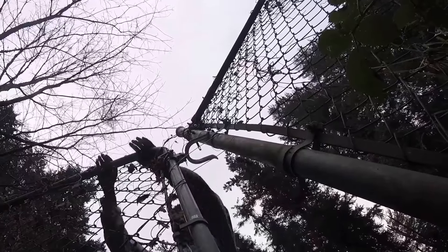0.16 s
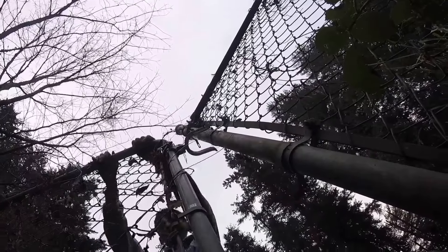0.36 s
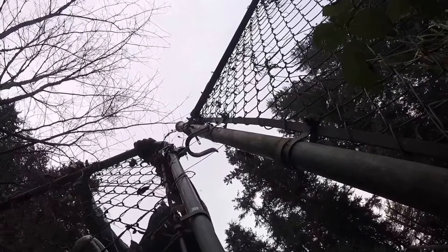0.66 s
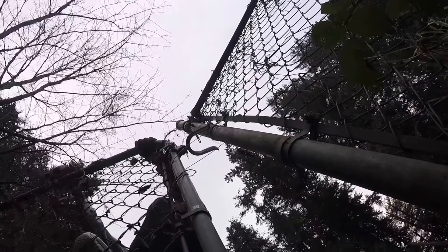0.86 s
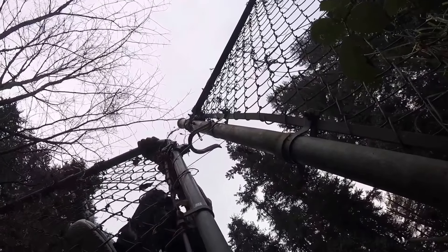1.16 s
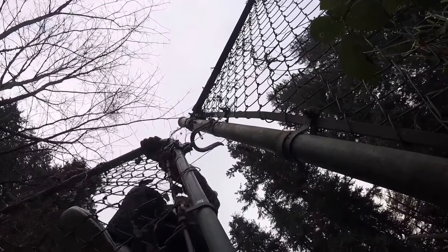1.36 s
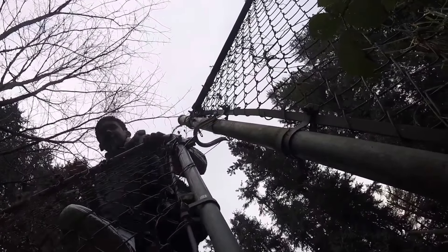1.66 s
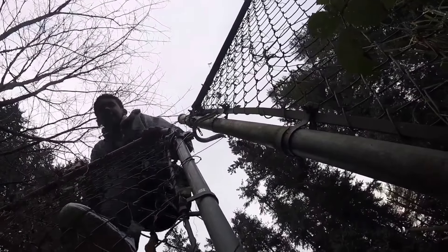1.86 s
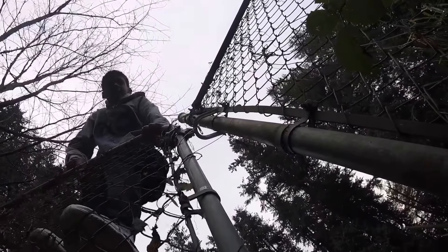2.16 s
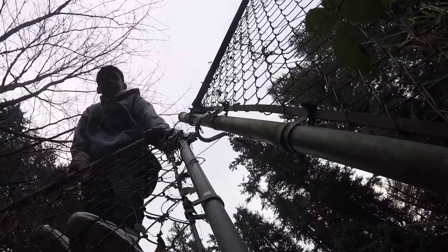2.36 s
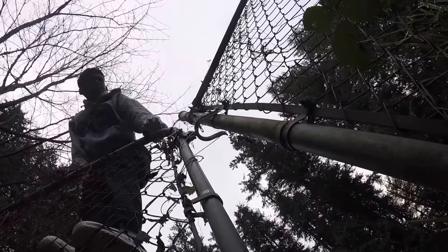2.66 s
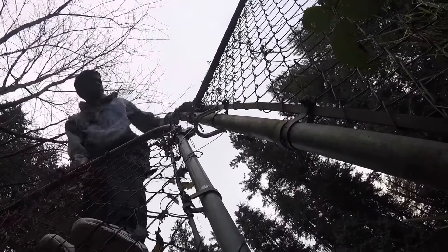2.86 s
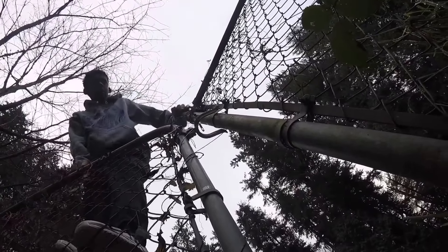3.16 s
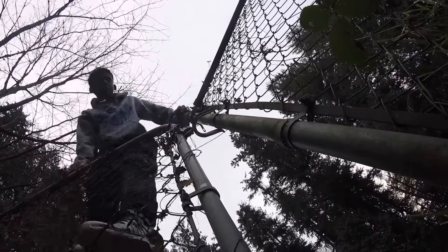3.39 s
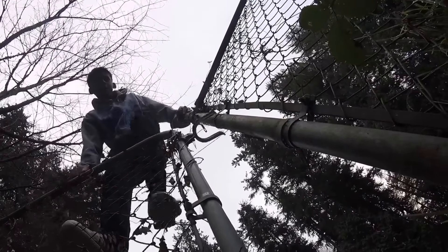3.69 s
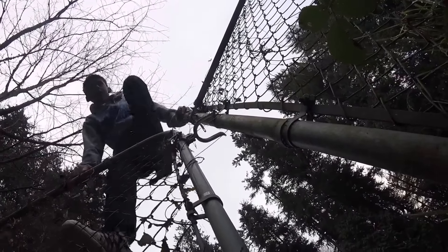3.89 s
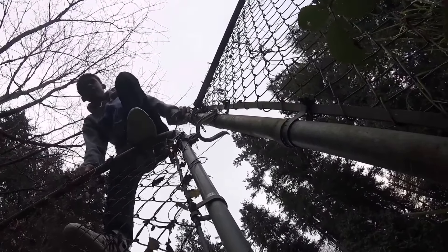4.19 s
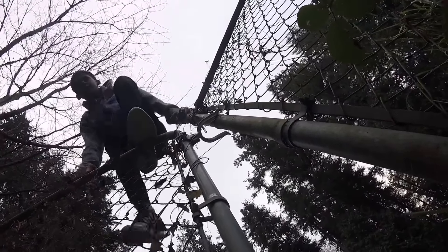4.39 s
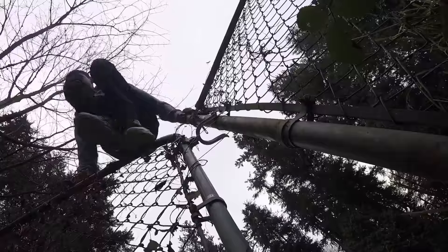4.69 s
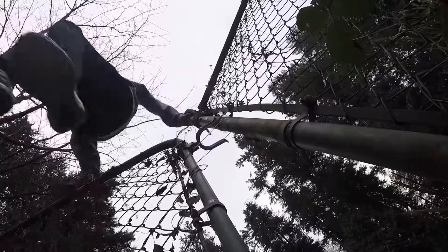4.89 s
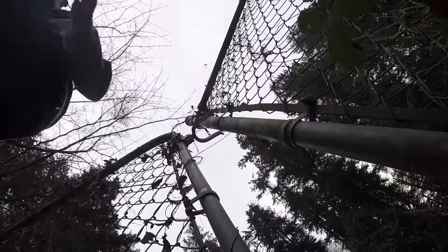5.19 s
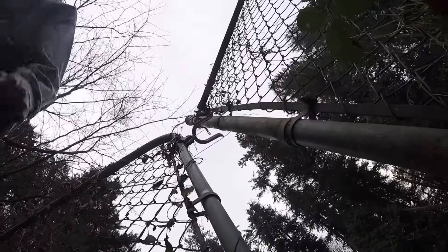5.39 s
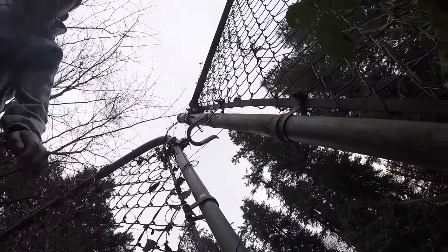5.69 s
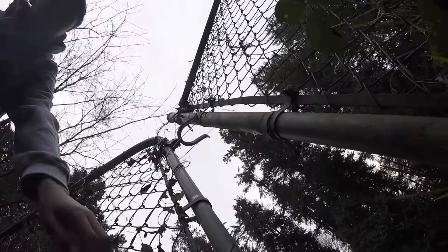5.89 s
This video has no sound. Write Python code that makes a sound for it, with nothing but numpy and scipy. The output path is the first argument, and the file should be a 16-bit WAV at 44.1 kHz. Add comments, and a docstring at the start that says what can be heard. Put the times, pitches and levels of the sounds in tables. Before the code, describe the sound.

Outdoors, close to the foot of a steel gate post, with very faint far traffic, treetop wind and a barely audible low hum in the first half second. Soft thumps and small wire ticks begin around 0.2 s. At 0.6-0.8 s hard clanks and a deep jolt shake the gate, leaving a short hollow pipe ring and rumble. Mesh rattles and jingles strongly from 1.2 to 1.6 s; more clanks, knocks and a heavy thump fall around 1.9-2.5 s, thinning until 3.2 s. The loudest, brightest clatter strikes at 3.3-3.85 s with a ringing hook and heavy thuds. Another thump near 4.1 s accompanies a tiny sole chirp and squeak. Lighter clinks and a swelling low rumble follow at 4.7-5 s. At 5.1 s a solid landing crushes dry leaves, with crisp snaps until 5.4 s, then small rustles and scuffs, one with a soft thud at 5.84 s.

```python
"""A chain-link gate rattles and clanks on its steel pipes as a person climbs it and drops into dry leaves.
Mesh is modulated noise and damped taps; struck steel is noise bursts and decaying modes.
Shifts of weight thump as damped swings and rumble as filtered noise; a sole squeaks in stick-slip harmonics.
Leaves are clumped noise, grains and snaps; far traffic and treetop wind are shaped noise beside a brief hum.
All is heard from the foot of the post."""
import sys
import numpy as np
from scipy.fft import rfft, irfft, next_fast_len
from scipy.io import wavfile
from scipy.ndimage import uniform_filter1d, map_coordinates

SR = 44100
rng = np.random.default_rng(int(sys.argv[2]) if len(sys.argv) > 2 else 0)


def generate_wav(signal):
    """Clip the signal to [-1, 1] and save it as 16-bit WAV at the path in sys.argv[1]."""
    frames = np.transpose(np.atleast_2d(signal))
    scaled = np.clip(frames, -1, 1) * 32767
    pcm = np.round(scaled).astype(np.int16)
    wavfile.write(sys.argv[1], SR, pcm)


N = 266364

# Levels are relative: each source applies its own gain. Spectra list f/Hz, relative level/dB.

# mesh wires rubbing and tapping: t/s, level/dB, treble share/dB
MESH_MOTION = [(0.0, -58, -18), (0.35, -47.5, 2.5), (0.56, -47.5, 1), (0.6, -37.5, 4), (0.8, -47.5, 12),
               (0.95, -52, 9), (1.18, -37, -8), (1.28, -48, -14), (1.35, -34, 3.5), (1.48, -28.5, 3.5),
               (1.59, -31.5, -19), (1.69, -55, -4), (1.8, -36.5, -6), (1.98, -39.5, -7), (2.33, -40.5, 1),
               (2.68, -50.5, 3.5), (3.29, -53, -6), (3.45, -41.5, 4), (3.5, -31, 12), (3.6, -39, -8),
               (3.74, -36, 9), (3.86, -55, -3), (4.1, -50, -15), (4.16, -40, 15), (4.4, -55.5, -4),
               (4.7, -41, -2), (4.91, -51.5, -7), (5.03, -38, -8), (5.07, -42, -15)]
# single wire ticks: t/s, level/dB
WIRE_TICKS = [(0.265, -37), (0.3267, -38), (0.342, -41), (0.385, -37), (0.428, -36.5), (0.4655, -35),
              (0.513, -37), (0.53, -40), (0.6543, -25), (0.7293, -29), (0.774, -33), (0.795, -36.5),
              (0.878, -26), (0.9535, -30.5), (1.0844, -35.5), (1.183, -34.5), (2.0094, -34),
              (2.3444, -33.5), (2.801, -30), (3.1, -41), (3.334, -31), (3.5494, -19), (3.78, -29),
              (4.349, -36), (4.622, -35), (4.667, -38)]
# bright shiver and thin hiss of the wires: f/Hz, level/dB
WIRE_SPECTRUM = [(2500, -25), (4300, -2), (6300, 6), (8500, -11), (11000, -8), (12000, -29), (15500, -40)]
# steel on steel: t/s, level/dB, dull share/dB, bright share/dB, fade/(dB per ms)
STEEL_CLANKS = [(0.582, -11, -23, -2.5, 0.6), (0.6126, -6, -24, -12, 1), (0.641, -30.5, 16.5, -14, 1),
                (0.676, -24.5, -22, 0.5, 0.1), (0.707, -25, -30.5, 8.5, 1.5), (0.8178, -4, -20, -7.5, 1.04),
                (0.986, -30, 4, -11, 1.5), (1.118, -31.5, -22.5, -1, -0.1), (1.337, -13, 14, -17, 4),
                (1.342, -34, 5, -3, 0.2), (1.4097, -29, -12, 8.5, 3.5), (1.4906, -18, 7, -9, 0.7),
                (1.5305, -9, -2.5, -3, 1.3), (1.5856, -16, 4.5, -2, 1.5), (1.6027, -10.5, 4.5, -17, 2.7),
                (1.77, -34.5, 4, -10, 0.6), (1.7874, -21.5, 1.5, -9.5, 0.5), (1.8853, -12.5, -7, -13, 1.5),
                (1.8966, -3.5, -8, -11.5, 1), (1.9546, -32.5, 27, -19, 2), (2.0855, -27, 6, 8.5, 2.5),
                (2.13, -26, 5, 4, 1.2), (2.197, -28, 14.5, -9, 0.9), (2.2678, -13, -1.5, -7, 1.1),
                (2.31, -20, 4, -12, 1.2), (2.3734, -15.5, 0.5, -12, 0.7), (2.3904, -9, 3, -5, 3.5),
                (2.4765, -25.5, 8, -0.5, 0.35), (2.5966, -25.5, 8.5, -8, 0.7),
                (2.7917, -31.5, 17.5, -10, 1.5), (2.8372, -24.5, -2, -0.5, 2.5),
                (2.8652, -20.5, -3, -1.5, 2), (2.997, -30, -3, -28.5, 0.3), (3.3057, -6.5, -30, -14, 1.8),
                (3.365, -29.5, 12.5, -11, 0.24), (3.409, -31, 12, -12, 1.8), (3.419, -30.5, 25, -24, 2.5),
                (3.462, -32, 2, -11, 0), (3.5034, -5.5, -27, -7, 2.5), (3.51, 0, -41, -6.5, 1.65),
                (3.6005, -7, -37, -9, 1.5), (3.6438, -13, 0.5, -9, 0.4), (3.674, -21, -9, -16, 1.5),
                (3.733, -3.5, -36, -14.5, 1), (3.801, -24, -5, -15, 1), (3.8432, -34, 19, -28, 2.5),
                (3.893, -33, -1, -31, 1.5), (3.927, -27, -1, -31, 3), (4.0427, -16.5, -6, -4.5, 1.2),
                (4.074, -24, -5, -13, 0.6), (4.1334, -22, -14.5, -12.5, 1.32), (4.2303, -14, -19, -14, 1),
                (4.3, -23.5, 0.5, -31, 2.5), (4.7056, -21.5, -3, -0.5, 1), (4.7436, -19, 5, 3.5, 4.5),
                (4.8066, -14.5, -23, -43, 1.3), (5.016, -21.5, -2, -11, 0.9)]
# rise time constants/s of the dull, middle and bright part of a burst
BURST_RISES = (0.00057, 0.00085, 0.00076)
# heavy, middle and bright contacts: f/Hz, level/dB
DULL_SPECTRUM = [(250, 9.5), (500, -3.5), (900, 3), (1500, -3.5), (2200, -14.5), (3500, -70)]
MIDDLE_SPECTRUM = [(900, -8), (1600, 4), (2500, 4.5), (3600, -1), (4800, -7.5), (7000, -39)]
BRIGHT_SPECTRUM = [(2500, -36), (4300, -1), (6300, -1), (7500, -5), (9000, -14.5), (12000, -23),
                   (15500, -42)]
# thin top of a short, hard contact: f/Hz, level/dB
SPARK_SPECTRUM = [(6000, -30), (8500, 3), (11000, 0), (14000, -10), (15800, -15)]
# short broad modes of the struck pipes: f/Hz, level/dB, t60/s
CLACK_MODES = [(1115, -8, 0.079), (1440, -1.5, 0.041), (2530, 4, 0.046), (2747, -2, 0.022),
               (3517, 4, 0.024), (4640, -14, 0.022), (6300, -24, 0.023), (10100, -19, 0.027)]
# loose parts left ringing: t/s, part name, level/dB
PART_RINGS = [(.25, "post", -33), (.33, "post", -32.5), (.613, "bracket", -41), (.64, "post", -17.5),
              (0.731, "tie", -43), (.66, "bracket", -41), (.75, "post", -25), (.819, "bracket", -39),
              (.821, "hook", -31), (.84, "post", -30), (.985, "post", -24), (1.065, "brace", -50),
              (1.09, "post", -24), (1.185, "post", -30.5), (1.337, "brace", -44), (1.38, "brace", -46),
              (1.5, "post", -22.5), (1.531, "chain", -30), (1.54, "hook", -43), (1.788, "brace", -47),
              (1.9, "post", -28.5), (1.903, "hook", -38), (2.22, "post", -25), (2.267, "chain", -34.5),
              (2.269, "brace", -45), (2.27, "hook", -40.5), (2.31, "hook", -42.5), (2.395, "bracket", -37),
              (2.4, "hook", -44), (2.81, "post", -34), (3.305, "bracket", -43), (3.33, "post", -32.5),
              (3.366, "brace", -47), (3.51, "bracket", -34), (3.515, "hook", -20), (3.602, "chain", -44),
              (3.647, "chain", -34), (3.604, "hook", -37), (3.68, "post", -26.5), (3.735, "bracket", -38),
              (3.737, "hook", -35), (3.76, "post", -27), (3.94, "post", -37), (4.1, "post", -30),
              (4.72, "post", -26.5), (4.76, "post", -33), (4.82, "post", -32), (4.94, "post", -22.5),
              (5.02, "post", -27)]
# modes of each named part: f/Hz, level/dB, t60/s
PART_MODES = {"hook": [(6110, -6.5, 0.19), (6220, -1, 0.13), (6290, 9.5, 0.061), (6500, 4, 0.04)],
              "chain": [(4300, -19, 0.094), (5320, -3, 0.21), (5600, -2.5, 0.25), (7200, -15, 0.11)],
              "bracket": [(2167, 1, 0.39), (2520, -15, .1)], "brace": [(1747, 13, 0.2), (2890, -21, 0.084)],
              "tie": [(3990, 1.5, 0.177)], "post": [(275.4, 3.5, 0.31), (370.6, -6.5, 0.14)]}
# weight landing: t/s, level/dB, half-swing width/ms, following rumble/dB, frame ring/dB
WEIGHT_THUMPS = [(0.23, -21, 8.8, -28, -40), (0.447, -17, 8.5, -40, -49.5), (0.592, -31, 2.7, -43, -23),
                 (0.63, -10, 2.84, -37, -18), (0.67, -11, 1.46, -11, -18.5), (0.847, -16.5, 2.7, -27, -29),
                 (0.9, -28, 5.5, -24, -38), (1.001, -18.5, 3.5, -17, -33), (1.095, -24.5, 2.9, -22, -43),
                 (1.2, -21, 3.5, -30, -25.5), (1.499, -12, 1.56, -25, -26), (1.661, -25, 4, -24, -27.5),
                 (1.96, -8.5, 3.76, -10.5, -31), (2.011, -16, 2.15, -23, -38),
                 (2.222, -22, 3.9, -17.5, -29), (2.33, -32, 5, -24.5, -38), (2.41, -28, 5, -17.5, -38),
                 (2.479, -22, 2.9, -15, -27.5), (2.619, -17, 4.6, -17, -21), (2.799, -28, 3.3, -25, -33),
                 (2.97, -32, 5, -22, -39.5), (3.426, -11.5, 2.46, -15, -24),
                 (3.486, -11.5, 4.2, -14.5, -19), (3.537, -10.5, 3.2, -13, -14.5),
                 (3.69, -25, 4.3, -13, -26.5), (3.758, -7, 3.76, -17, -25),
                 (3.846, -5.5, 2.43, -16.5, -21.5), (4.044, -17, 1.65, -32, -34),
                 (4.093, -4, 2.76, -11.5, -25), (4.32, -20.5, 4, -19, -36), (4.72, -30, 3.1, -16, -33),
                 (4.831, -26, 4, -14.5, -28.5), (5.038, -16.5, 1.86, -28, -36),
                 (5.0946, -4.5, 1.96, -8.5, -13), (5.223, -16.5, 1.7, -22, -26.5),
                 (5.26, -26, 4.9, -15, -43), (5.841, -20.5, 2.8, -14, -35)]
# sole on steel or soil: f/Hz, level/dB
SLAP_SPECTRUM = [(150, -10), (350, 0.5), (800, -10), (1500, -16.5), (3000, -38)]
# sway of the gate under the climber: t/s, ground rumble level/dB
GATE_SWAY = [(0.0, -43), (0.72, -29.5), (0.87, -19), (1.06, -21), (1.43, -25.5), (1.75, -30.5),
             (2.14, -26.5), (2.61, -31.5), (3.06, -39), (3.33, -28), (3.6, -19.5), (4.41, -29.5),
             (4.59, -27), (4.89, -16), (5.08, -20.5), (5.37, -37.5), (5.63, -36.5), (6.04, -29.5)]
# rumble through the ground: f/Hz, level/dB
GROUND_SPECTRUM = [(8.8, -56), (15, -1), (64, 6), (75, -2), (124, -13), (158, -16.5), (221, -36),
                   (240, -17), (310, -43), (530, -120)]
# bending modes of the frame: f/Hz, damping width/Hz, level/dB
PIPE_MODES = [(146.2, 49, 1), (272.6, 16.7, 0), (448, 88, -11.5)]
# gate rail knocking on its post: t/s, level/dB
RAIL_KNOCKS = [(0.611, -24), (0.635, -23.5), (0.663, -22.5), (0.69, -28), (0.818, -24), (1.191, -32),
               (1.304, -32), (1.377, -29), (1.476, -28.5), (1.584, -28), (1.632, -20), (1.767, -31.5),
               (1.845, -24.5), (1.896, -19), (1.955, -23.5), (2.063, -24.5), (2.106, -19), (2.219, -20),
               (2.39, -24.5), (2.453, -23.5), (2.489, -18.5), (2.621, -31), (2.793, -22), (3, -36.5),
               (3.307, -20.5), (3.406, -24.5), (3.479, -21), (3.653, -29), (3.732, -21), (3.839, -32),
               (4.041, -30.5), (4.091, -29.5), (4.239, -28.5), (4.3, -31.5), (4.661, -31.5), (4.727, -27),
               (4.748, -29), (4.775, -30), (4.809, -28), (4.835, -29), (4.93, -30), (5.019, -30.5),
               (5.09, -29), (5.117, -26.5)]
# modes of the knocked rail: f/Hz, level/dB, t60/s
RAIL_MODES = [(376.5, -6, 0.097), (432.2, 1.5, 0.1), (453.4, 1, 0.17), (807, -5.5, 0.063)]
# sole slipping on the rail, chirp then squeak: t/s, slip rate f/Hz, level/dB, roughness (clipped to 0-1)
SOLE_CHIRP = [(4.058, 4220, -46, .6), (4.063, 4050, -24, 0.39), (4.07, 3250, -27, 0.42),
              (4.077, 3000, -46, .9)]
SOLE_SQUEAK = [(4.13, 1150, -74.5, .3), (4.136, 1157, -33.5, 0.44), (4.155, 1260, -27.5, 0.45),
               (4.175, 1600, -36, 1.1), (4.215, 1200, -34.5, 1.1), (4.226, 960, -54, 1.1)]
# response of the sole: f/Hz, level/dB
SOLE_SPECTRUM = [(530, -41), (900, -14), (1190, -6), (1720, -24), (2520, -7.5), (3410, -18.5), (6200, -6.5),
                 (7980, -24), (10600, -19), (12200, -40), (13400, -34), (15800, -52)]
# shoes in dry leaves: start t/s, length/s, level/dB, swell to the end/dB, low share/dB
LEAF_SCUFFS = [(5.079, 0.13, -40, -5.5, 5.5), (5.228, 0.033, -50.5, 2.5, 3.5),
               (5.281, 0.11, -50.5, -0.5, 5.5), (5.446, 0.1, -44, -1.5, -0.5), (5.542, .11, -41, 0.5, 7),
               (5.734, 0.038, -42.5, -0.5, 4), (5.792, .015, -47, 0, 1), (5.823, 0.076, -38.5, -7, 5)]
# twigs and leaves snapping: t/s, level/dB, low share/dB
LEAF_SNAPS = [(5.0928, -17.5, 0), (5.1189, -20, 2), (5.1454, -20, -8), (5.162, -11, -6.5),
              (5.1792, -8.5, -4.5), (5.201, -18, -8), (5.204, -17, -4), (5.212, -16.5, -8),
              (5.2218, -7, -10.5), (5.2577, -27, -20), (5.285, -24, -10.5), (5.338, -30, -15),
              (5.3543, -18, -3.5), (5.358, -18.5, 0), (5.392, -32, -12), (5.377, -23, -0.5),
              (5.613, -20, -14), (5.571, -20, -15), (5.741, -18, -7), (5.8353, -16, 2), (5.877, -22, -17),
              (5.912, -23, -16), (5.942, -33, -15), (5.992, -26.5, 0), (6.0113, -28.5, 3.5),
              (6.017, -30, -3)]
# upper and lower part of the leaf noise: f/Hz, level/dB
CRISP_SPECTRUM = [(2060, -7.5), (3500, -1.5), (4680, -16), (5910, -1), (7180, -2.5), (10600, -26),
                  (14500, -26), (15800, -45.5)]
CRUNCH_SPECTRUM = [(240, -13), (400, -1), (1010, -4.5), (1420, -1.5), (1550, -2), (2020, -5.5), (4500, -23),
                   (5850, -26), (9900, -120)]
# far traffic and treetop wind: f/Hz, level/dB
AIR_SPECTRUM = [(24, -25), (40, 4), (73, -2.5), (109, -9), (289, -20.5), (335, -21.5), (596, -28.5),
                (935, -26), (1790, -35), (3110, -49), (8450, -48.5), (13900, -59), (15800, -74)]
# passing low hum: t/s, level/dB
HUM_LEVEL = [(0, -43), (.2, -46), (.26, -58), (.42, -47.5), (.56, -44), (.64, -80)]

AIR_DB, HUM_HZ = -35, 194.4
TOP_HZ = 15900  # band limit
FRAME_DB, POST_DB = -17.5, -22.5  # pipe modes relative to the sway
JOLT_RISE_S, RUMBLE_T60, FRAME_T60, POST_T60 = 0.014, 0.39, 0.19, 0.29  # s
KNOCK_TO_POST_DB = -9.5  # a rail knock also shakes the post
SHIVER_DB, SHIVER_T60 = -44, 0.41  # wire shiver after a clank: dB, s
JINGLE_DB, JINGLE_CYCLES, WHISPER_DB = -6.5, 22, -32  # link taps and thin hiss, against the mesh level
TICK_T60 = 0.039  # s
CLACK_SCATTER_DB = 3.5
HOOK_DB, HOOK_GROWS = -27, 1.65  # hook gain; dB of hook ring per dB of clank
SPARK_DB, SPARK_PER_FADE, SPARK_T60 = -46, 7.7, 0.014  # faster-fading clanks get more thin top
SCUFF_ATTACK_S, SCUFF_RELEASE_T60, LEAF_REST_DB = 0.013, 0.11, -56.5
CRACK_DB, CRACK_SPREAD_DB = -0.5, 4.5  # leaf cracks against the scuff level; gain per grain size


def mesh():
    """Superposition of many small contacts: loose wires rub, links jingle, wires tap and tick."""
    return mesh_rub() + link_jingle() + wire_taps() + wire_ticks()


def mesh_rub():
    """Friction as modulated noise: motion sets level and treble, and clanks excite a decaying shiver."""
    level_db, treble_db = curves(MESH_MOTION)
    # still once the climber lets go
    gone = np.clip((MESH_MOTION[-1][0] + 0.046 - np.arange(N) / SR) / 0.049, 0, 1)
    grit = gone * amp(level_db - 2.5) * gritty(spiky_db=4.5, rate=150)
    middle = grit * amp(0.5 * treble_db - 10.5)
    bright = grit * amp(treble_db - 18.5)
    clank_s, clank_db, _, bright_db, _ = np.transpose(STEEL_CLANKS)
    shiver_db = clank_db + 0.5 * bright_db + SHIVER_DB
    shiver = swells(clank_s, shiver_db, rise=0.002, t60=SHIVER_T60) * gritty(spiky_db=0.0, rate=160)
    rub = coloured(grit, DULL_SPECTRUM) + coloured(middle, MIDDLE_SPECTRUM)
    rub += coloured(bright, BRIGHT_SPECTRUM)
    return rub + coloured(shiver + grit * amp(WHISPER_DB), WIRE_SPECTRUM)


def link_jingle():
    """Lightly damped resonance: links struck at random moments ring for many cycles."""
    level_db, treble_db = curves(MESH_MOTION)
    when, pitch, size = grains(count=700, t0=0, t1=MESH_MOTION[-1][0])
    at = (when * SR).astype(int)
    link_db = level_db[at] + 0.27 * treble_db[at] + JINGLE_DB + 2.0 * size - 6 * pitch
    return taps(when, link_db, 1100 * 5.5 ** pitch, JINGLE_CYCLES, size=1500)


def wire_taps():
    """Heavily damped resonance: wire crossings tap at random moments and die within a few cycles."""
    level_db, treble_db = curves(MESH_MOTION)
    when, pitch, size = grains(count=1200, t0=0, t1=MESH_MOTION[-1][0])
    at = (when * SR).astype(int)
    octaves = 3.2 * pitch
    slope_db = 0.2 * treble_db[at].clip(-30, 0) - 3.5  # per octave
    tap_db = level_db[at] - 6.5 + 3 * size + octaves * slope_db
    return taps(when, tap_db, 750 * 2 ** octaves, cycles=6.6)


def wire_ticks():
    """Impulsive contact: single ticks are exponentially decaying noise."""
    ticks, t = np.zeros(N), np.arange(SR // 12) / SR
    for s, db in WIRE_TICKS:
        add(ticks, s, amp(db - 12.5 - 60 * t / TICK_T60))
    ticks *= rng.standard_normal(N)
    return coloured(ticks, MIDDLE_SPECTRUM) + coloured(ticks, BRIGHT_SPECTRUM)


def clanks():
    """Impact excitation: each contact bursts, clacks in broad modes and rings the latch hook."""
    t = np.arange(SR // 3) / SR
    parts, clack, ring = np.zeros((3, N)), np.zeros(N), np.zeros(N)
    spark, post = np.zeros((2, N))
    for s, db, dull_db, bright_db, fade in STEEL_CLANKS:
        spark_db = db + 0.5 * bright_db + SPARK_DB + SPARK_PER_FADE * min(fade, 3.5)
        add(spark, s, amp(spark_db - 60 * t / SPARK_T60) * onset(t, 0.0008))
        fade = max(fade, 0.3)
        tail = 0.11 * min(1, 1.4 / fade) ** 2 * amp(-60 * t / 0.22)
        burst = amp(-1000 * fade * t) + tail
        for part, share_db, rise in zip(parts, (dull_db, -1.5, bright_db), BURST_RISES):
            add(part, s, amp(db + share_db - 11.5) * burst * onset(t, rise))
        middle_db = -max(dull_db, bright_db + 6.5, 0)  # dull or bright contacts miss the middle modes
        modes = ringing(CLACK_MODES, t, scatter_db=CLACK_SCATTER_DB, detune=0.0788)
        add(clack, s, amp(db - 17.0 + middle_db) * modes * onset(t, 0.00056))
        hook = ringing(PART_MODES["hook"], t, scatter_db=0.0, detune=0.0026) * onset(t, 0.002)
        add(ring, s, amp(HOOK_GROWS * db + middle_db + HOOK_DB) * hook)
    for s, name, db in PART_RINGS:
        modes = ringing(PART_MODES[name], t, scatter_db=1.0, detune=0.00214)
        add(post if name == "post" else ring, s, amp(db) * modes * onset(t, 0.0011))
    out = coloured(spark * gritty(spiky_db=2.0, rate=650), SPARK_SPECTRUM)
    for part, spectrum in zip(parts, (DULL_SPECTRUM, MIDDLE_SPECTRUM, BRIGHT_SPECTRUM)):
        out += coloured(part * gritty(spiky_db=2.0, rate=300), spectrum)
    flutter = amp(2.4 * wobble(150))  # touching parts make the ring flutter
    return out + clack + post + ring * flutter


def thumps():
    """Damped impulse: a sharp swing rebounds with a dull puff, then soil and post sway at a low pitch."""
    out, puff, t = np.zeros(N), np.zeros(N), np.arange(SR // 4) / SR
    lead = 0.012  # s, the swing begins ahead of its peak
    for s, db, width_ms, *_ in WEIGHT_THUMPS:
        u = (t - lead) * 1000 / width_ms
        swing = -np.cos(np.pi * u) * np.exp(-(u / np.where(u < 0, 1.2, 2.2)) ** 2)
        after = np.maximum(t - lead, 0)
        sway = 0.68 * np.sin(2 * np.pi * rng.uniform(52.4, 68.7) * after)
        sway *= amp(-60 * after / 0.14) * onset(after, 0.0048)
        add(out, s - lead, amp(db) * (swing + sway))
        # shorter blows slap more
        add(puff, s - 0.004, amp(db - 11.5 - 1.84 * width_ms - 60 * t / 0.087))
    return out + coloured(puff * rng.standard_normal(N), SLAP_SPECTRUM)


def frame():
    """Forced resonance: sway and jolts drive pipe modes and ground rumble; the rail knocks."""
    sway = amp(curves(GATE_SWAY)[0])
    jolt_s, _, _, rumble_db, ring_db = np.transpose(WEIGHT_THUMPS)
    knock_s, knock_db = np.transpose(RAIL_KNOCKS)
    ground = np.hypot(sway, swells(jolt_s, rumble_db, JOLT_RISE_S, RUMBLE_T60))
    pipe = np.hypot(sway * amp(FRAME_DB), swells(jolt_s, ring_db, JOLT_RISE_S, FRAME_T60))
    shaken = swells(knock_s, knock_db + KNOCK_TO_POST_DB, JOLT_RISE_S, POST_T60)
    post = np.hypot(sway * amp(POST_DB), shaken)
    out = ground * steady(coloured(rng.standard_normal(N), GROUND_SPECTRUM), span=0.068)
    for (hz, width, db), level in zip(PIPE_MODES, (pipe, post, post)):
        mode = lambda f: (f * width / (hz * hz - f * f + 1j * f * width)) ** 1.367
        out += level * amp(db) * steady(unit(filtered(rng.standard_normal(N), mode)), span=0.0326)
    t = np.arange(SR // 4) / SR
    for s, db in RAIL_KNOCKS:
        knock = ringing(RAIL_MODES, t, scatter_db=2.0, detune=0.019)
        add(out, s, amp(db - 2) * knock * onset(t, 0.0025))
    return out


def squeak():
    """Stick-slip friction: rubber slips in a harmonic chirp, then in a squeak that breaks into hiss."""
    t, out = np.arange(N) / SR, np.zeros(N)
    for slide in (SOLE_CHIRP, SOLE_SQUEAK):
        rate, level_db, rough = curves(slide)
        turns = np.cumsum(rate * (1 + 0.015 * wobble(200))) / SR
        slips = sum(np.cos(2 * np.pi * k * turns) * (k * rate < TOP_HZ) for k in range(1, 14))
        rough = np.clip(rough, 0, 1)
        sliding = (t > slide[0][0]) & (t < slide[-1][0])
        rubbing = (1 - rough) * unit(slips) + rough * rng.standard_normal(N)
        out += sliding * amp(level_db) * rubbing
    return coloured(out, SOLE_SPECTRUM)


def leaves():
    """Brittle fracture: crushed leaves hiss and crackle in dense grains; single ones snap."""
    level_db, low_db = scuffing()
    crisp = amp(level_db - 1.5)
    crunch = crisp * amp(low_db)
    t, snap, thud = np.arange(SR // 20) / SR, np.zeros(N), np.zeros(N)
    for s, db, share_db in LEAF_SNAPS:
        add(snap, s, amp(db - 8.0 - 60 * t / 0.0074))
        add(thud, s, amp(db + share_db - 6.5 - 60 * t / 0.016))
    snap_s, snap_db, share_db = np.transpose(LEAF_SNAPS)
    stem_hz = rng.uniform(1940, 3420, len(LEAF_SNAPS))
    pops = taps(snap_s, snap_db + 0.5 * share_db - 3.5, stem_hz, cycles=2.9)
    when, pitch, size = grains(count=900, t0=LEAF_SCUFFS[0][0], t1=N / SR)
    at = (when * SR).astype(int)
    grain_db = level_db[at] + (1 - pitch) * low_db[at] - 1.5 + 3 * size
    crackle = taps(when, grain_db, 1000 * 8 ** pitch, cycles=1.4)
    when, pitch, size = grains(count=400, t0=LEAF_SCUFFS[0][0], t1=N / SR)
    crack_db = level_db[(when * SR).astype(int)] + CRACK_DB + CRACK_SPREAD_DB * size
    crackle += taps(when, crack_db, 2200 * 4 ** pitch, cycles=2.8)
    grit = gritty(spiky_db=2.5, rate=360) * amp(1.7 * wobble(40))  # leaves give way in clumps
    crisp = crisp * amp(1.8 * wobble(55))  # high and low parts vary apart, so the clumps' colour varies
    crunch = crunch * amp(2.0 * wobble(55))
    fine = gritty(spiky_db=1.5, rate=840)
    upper = coloured(crisp * grit + snap * fine, CRISP_SPECTRUM)
    lower = coloured(crunch * grit + thud * fine, CRUNCH_SPECTRUM)
    return upper + lower + crackle + pops


def scuffing():
    """Envelopes with adding powers: each scuff rises, holds or swells, and dies into a faint rustle."""
    t = np.arange(N) / SR
    power = amp(2 * LEAF_REST_DB) * (t > LEAF_SCUFFS[0][0])
    for s, length, db, swell_db, _ in LEAF_SCUFFS:
        held_db = db + swell_db * np.clip((t - s) / length, 0, 1)
        held_db -= 60 * np.maximum(t - s - length, 0) / SCUFF_RELEASE_T60
        power = power + (amp(held_db) * np.clip((t - s) / SCUFF_ATTACK_S, 0, 1)) ** 2
    start_s, length_s, _, _, low_db = np.transpose(LEAF_SCUFFS)
    return 10 * np.log10(power + 1e-20), np.interp(t, start_s + length_s / 2, low_db)


def distance():
    """Broadband noise and a wavering tone: far traffic and treetop wind, and a brief hum."""
    wind = amp(AIR_DB + wobble(2.62)) * coloured(rng.standard_normal(N), AIR_SPECTRUM)
    pitch_hz = HUM_HZ * (1 + 0.0278 * wobble(17.0))
    hum_db = curves(HUM_LEVEL)[0] + 4.5 + 1.8 * wobble(22.4)
    return wind + amp(hum_db) * np.sin(2 * np.pi * np.cumsum(pitch_hz) / SR)


def amp(db):
    """Logarithmic level: dB to amplitude ratio."""
    return 10 ** (np.asarray(db) / 20)


def unit(x):
    """Normalisation to unit root mean square."""
    return x / np.sqrt(np.mean(x ** 2) + 1e-20)


def onset(t, rise):
    """Exponential build-up with time constant rise/s."""
    return 1 - np.exp(-t / rise)


def curves(rows):
    """Linear interpolation: one value per sample for each column after t/s."""
    s, *cols = np.transpose(rows)
    return [np.interp(np.arange(N) / SR, s, c) for c in cols]


def wobble(rate):
    """Band-limited fluctuation: a smooth random curve, rate knots a second."""
    knots = rng.standard_normal(int(N * rate / SR) + 4)
    return map_coordinates(knots, [np.arange(N) * rate / SR])


def filtered(x, response):
    """Linear filtering: the spectrum of x times a response of f/Hz."""
    m = next_fast_len(N + 8192)
    return irfft(rfft(x, m) * response(np.fft.rfftfreq(m, 1 / SR)), m)[:N]


def coloured(x, points):
    """Spectral shaping by f/Hz, level/dB points on a log axis; white noise keeps its level."""
    f, v = np.transpose(points)
    return filtered(x, lambda hz: unit(amp(np.interp(np.log(hz + 1), np.log(f), v, -90, -90))))


def gritty(spiky_db, rate):
    """Amplitude modulation: white noise with rate random level knots a second, like dense tiny contacts."""
    return unit(rng.standard_normal(N) * amp(spiky_db * wobble(rate)))


def add(x, s, piece):
    """Superposition: mix a piece into x at time s."""
    part = x[round(s * SR):][:len(piece)]
    part += piece[:len(part)]


def steady(x, span):
    """Level compression: evens out chance swells slower than span seconds."""
    return unit(x / np.sqrt(np.abs(uniform_filter1d(x * x, int(span * SR))) + 0.4))


def ringing(modes, t, scatter_db, detune):
    """Modal decay: damped sines at new strengths and slightly new pitches."""
    return sum(amp(db + rng.normal(0, scatter_db) - 60 * t / t60)
               * np.sin(2 * np.pi * hz * rng.normal(1, detune) * t)
               for hz, db, t60 in modes)


def taps(times, levels_db, pitches_hz, cycles, size=400):
    """Damped oscillation: one short sine for each tap."""
    k = np.arange(size)
    turns = pitches_hz[:, None] * k / SR
    decay = np.exp(-turns / cycles) * (1 - k / len(k))
    waves = amp(levels_db)[:, None] * np.sin(2 * np.pi * turns) * decay
    at = (times * SR).astype(int)[:, None] + k
    return np.bincount(at.ravel(), waves.ravel(), N + len(k))[:N]


def grains(count, t0, t1):
    """Random point process: times, pitch positions 0-1 and sizes with a few large ones."""
    when, pitch, size = rng.random((count, 3)).T
    return t0 + (t1 - t0) * when, pitch, np.minimum(-np.log(1 - size), 4)


def swells(times, levels_db, rise, t60):
    """Power addition: gain that rises to each event and dies away after it."""
    power, t = np.zeros(N), np.arange(SR // 2) / SR
    shape = (amp(-60 * np.maximum(t - rise, 0) / t60) * np.clip(t / rise, 0, 1)) ** 2
    for s, db in zip(times, levels_db):
        add(power, s - rise, amp(2 * db) * shape)
    return np.sqrt(power)


def scene():
    """Superposition of all sources in one channel."""
    return (mesh() + clanks() + thumps() + frame() + squeak() + leaves() + distance())[None]


def record(dry):
    """Soft saturation, then a sharp low-pass at the band limit."""
    x = dry[0] / (1 + np.abs(dry[0] / 0.95) ** 6) ** (1 / 6)
    return filtered(x, lambda hz: hz < TOP_HZ)[None]


dry = scene()
out = record(dry)
generate_wav(out)
```